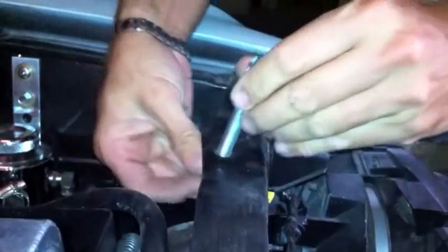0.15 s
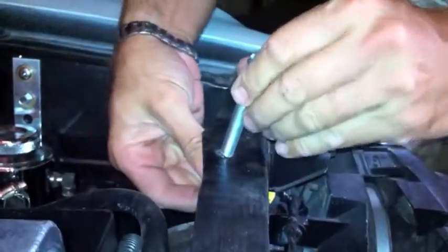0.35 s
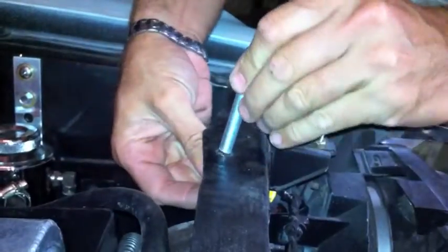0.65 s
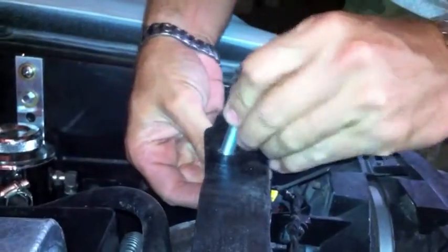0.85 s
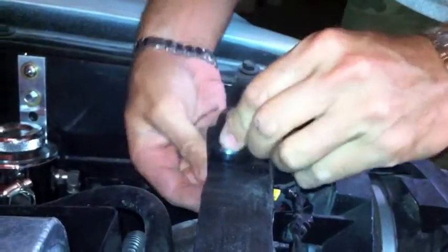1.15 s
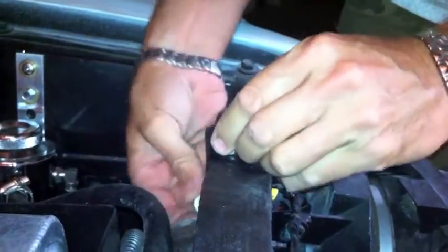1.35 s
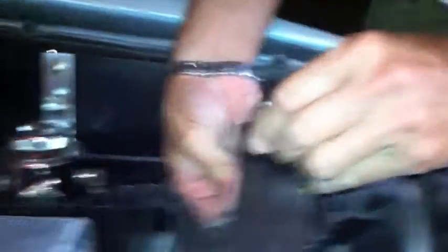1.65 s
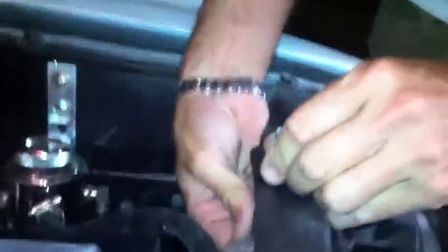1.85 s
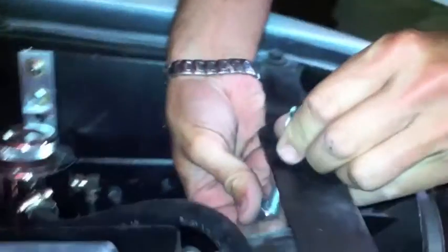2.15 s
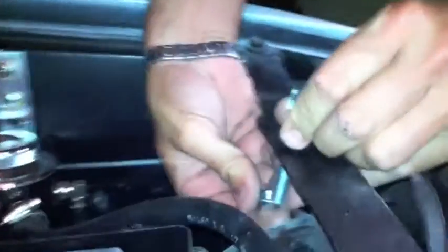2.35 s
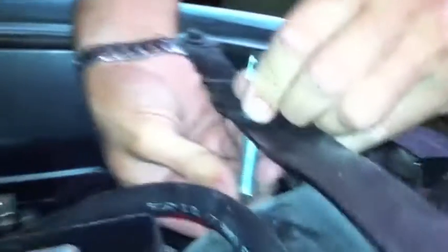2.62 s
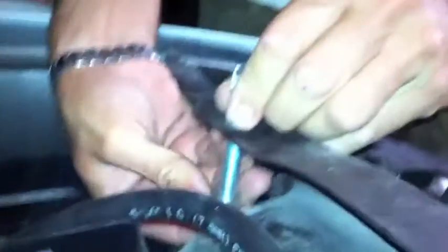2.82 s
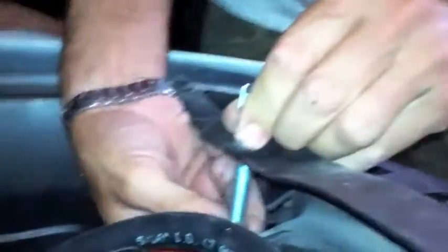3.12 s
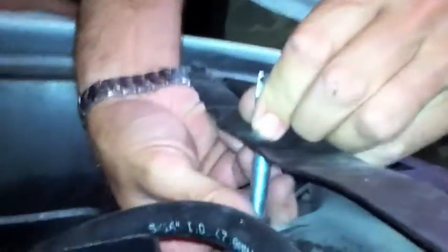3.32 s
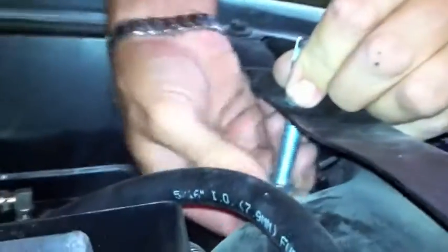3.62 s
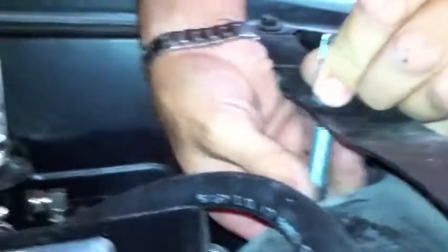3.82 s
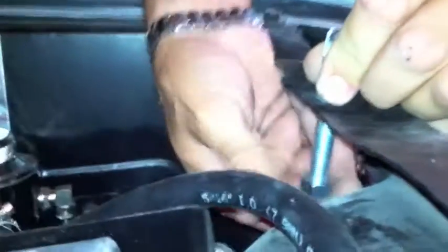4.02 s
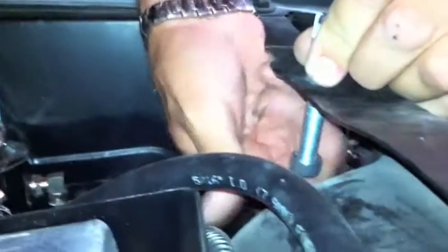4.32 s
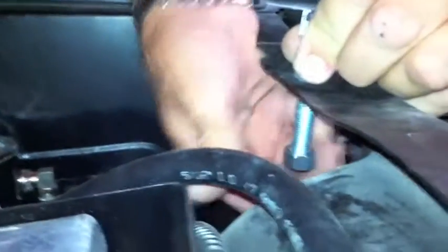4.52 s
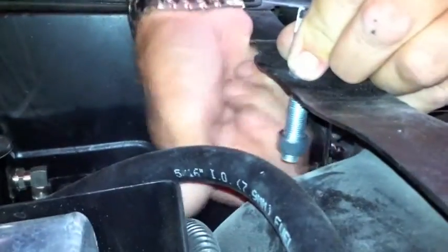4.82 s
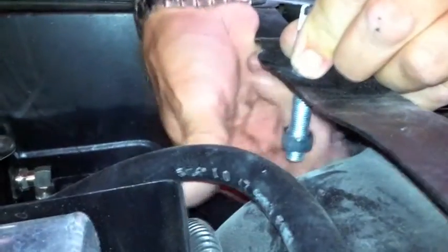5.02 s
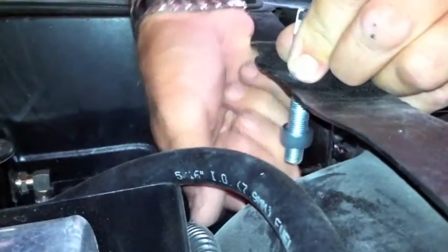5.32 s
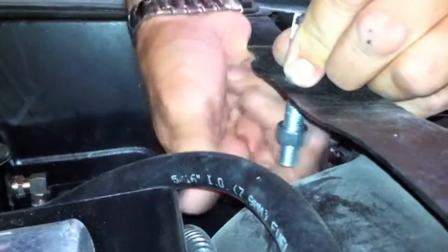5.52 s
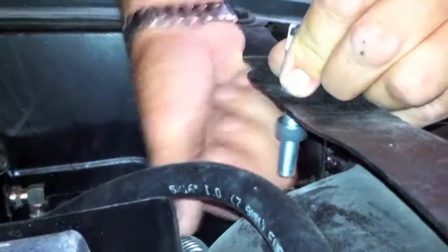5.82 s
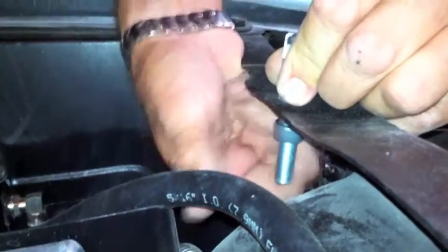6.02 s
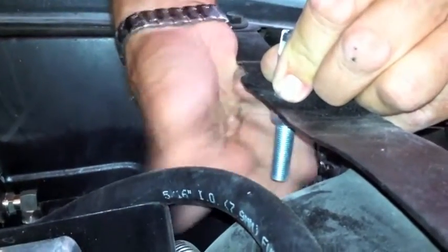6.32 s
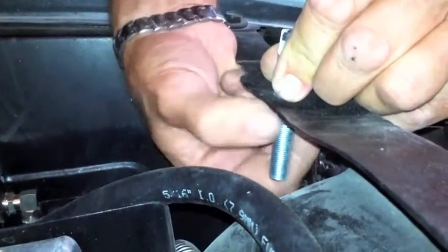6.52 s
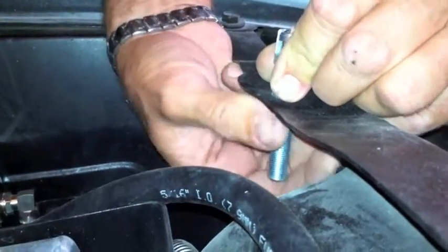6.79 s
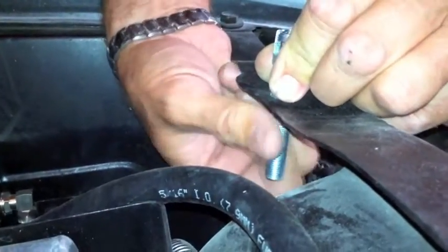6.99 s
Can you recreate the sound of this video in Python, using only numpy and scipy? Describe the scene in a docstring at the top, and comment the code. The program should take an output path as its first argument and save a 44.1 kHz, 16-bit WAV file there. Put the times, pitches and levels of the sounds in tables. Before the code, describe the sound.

A loose bolt clatters sharply through a hole in a metal strap, then a nut is spun up its thread in small raspy, ringing clicks.

```python
"""Bolt and nut in an engine bay

A bolt is pushed rattling through a hole in a steel strap, then a nut is spun up its thread.
Each contact is a short burst of tiny impacts that rings the strap or the nut; between them metal and skin rub.
The bay adds short dull echoes. Breeze bumps the microphone in the bass, over a soft outdoor hush."""
import sys
import numpy as np
from scipy import signal
from scipy.fft import rfft, irfft, next_fast_len
from scipy.io import wavfile

SR = 44100
rng = np.random.default_rng(int(sys.argv[2]) if len(sys.argv) > 2 else 0)


def bounce(signal):
    """Save signal as a 16-bit WAV file at the path given by the first command-line argument."""
    frames = np.transpose(np.atleast_2d(signal))
    limited = np.clip(frames, -1, 1)
    pcm = np.round(limited * 32767).astype(np.int16)
    wavfile.write(sys.argv[1], SR, pcm)


def gain_from_db(level_db):
    """Convert decibel levels to linear amplitude factors (20 dB per decade)."""
    decades = np.asarray(level_db, float) / 20
    return 10 ** decades


N = 315315

NUT_ON_S = 4.09  # from here on the nut rings instead of the strap
NUT_STOPS_S, STOP_T60_S = 6.405, 0.018  # the nut jams and a finger damps it


def bolt_in_strap(force):
    """The loose bolt rattles in the strap: broad clatter and ringing strap modes."""
    # modes of strap and loose bolt: f/Hz, width/Hz, level/dB
    strap_modes = [(385, 60, -8), (720, 70, -9), (900, 60, -4), (1040, 60, -5), (1210, 100, -3),
                   (1530, 50, -6), (2245, 40, -7), (2615, 40, -4), (2790, 50, 0), (3310, 110, -8),
                   (3690, 110, -5), (4300, 80, -8), (4590, 100, -3), (5110, 110, -2), (5290, 120, -1),
                   (5850, 60, -10), (6670, 160, -11), (8930, 90, -20)]
    # clatter density, levelled anew in each register: f/Hz, level/dB per Hz
    strap_colour = [(150, -29), (300, -10.5), (480, -14), (650, -7.5), (1100, -7.5), (1900, -6.5),
                    (2700, -8), (3300, -7.5), (5200, -4.5), (7500, -17.5), (12500, -21), (16000, -30)]
    t = np.arange(N) / SR
    return metal(force * (t < NUT_ON_S), strap_colour, strap_modes, ring_db=1, waver_db=3.5)


def nut_on_thread(force):
    """The nut rings on the thread; spinning close under the strap it rings higher up as well."""
    # modes of the nut on the thread: f/Hz, width/Hz, level/dB
    nut_modes = [(370, 70, -12), (750, 90, -7), (1060, 100, -7), (1330, 130, -7), (1670, 70, -5),
                 (1970, 110, -2), (2270, 80, -6), (2640, 90, -3), (3360, 110, -6), (4020, 140, -1),
                 (4990, 80, -1), (5370, 90, -2), (5800, 150, -9), (6300, 200, -10), (6820, 120, -8),
                 (9300, 300, -14)]
    # clatter density, levelled anew in each register: f/Hz, level/dB per Hz
    nut_colour = [(300, -22), (560, -15.5), (800, -8.5), (1300, -7.5), (2100, -8), (3100, -7.5),
                  (4200, -5.5), (5600, -4.5), (6900, -7.5), (7700, -12), (9400, -14), (12500, -21.5),
                  (15500, -24.5), (16500, -36)]
    # added mode close under the strap: f/Hz, width/Hz, level/dB
    near_modes = [(6810, 110, -2)]
    near_from_s = 6.04
    t = np.arange(N) / SR
    near = (t >= near_from_s) & (t < NUT_STOPS_S + STOP_T60_S)
    free = (t >= NUT_ON_S) & ~near
    spun = metal(force * free, nut_colour, nut_modes, ring_db=2, waver_db=3)
    return spun + metal(force * near, nut_colour, nut_modes + near_modes, ring_db=2, waver_db=3)


def pings():
    """Where a blow lands decides which pitch pings out: a short dying chatter of impacts into one mode."""
    # pings, levels ahead of the mix: t/s, rms level at the start/dB, f/Hz
    ping_rows = [(0.553, -26, 1210), (0.8579, -14, 4540), (0.907, -15, 2790), (0.948, -16, 5220),
                 (0.948, -18, 2790), (0.99, -31, 5170), (1.014, -39, 5200), (1.038, -37, 5160),
                 (1.063, -37, 5200), (1.088, -37, 5160), (1.109, -33, 5270), (1.121, -31, 5160),
                 (1.132, -20, 5060), (1.132, -25, 1530), (1.168, -34, 5140), (1.2, -27, 5200),
                 (1.212, -28, 5100), (1.252, -32.5, 5200), (1.426, -37, 1930), (1.531, -46, 1615),
                 (1.612, -35, 4460), (1.612, -30, 1940), (1.587, -38, 5250), (1.914, -35, 5180),
                 (2.045, -49, 700), (2.225, -32, 6480), (2.414, -43, 1570), (3.131, -43, 1150),
                 (3.494, -43, 4160), (4.017, -27.5, 5080), (4.017, -35, 5700), (4.159, -35, 5440),
                 (4.393, -37, 1650), (4.415, -41, 5450), (4.436, -43, 3850), (4.685, -32, 6350),
                 (5.155, -47, 6310), (5.332, -40, 4970), (5.353, -33, 1890), (5.388, -32, 3680),
                 (5.426, -38, 3920), (5.591, -35, 5730), (5.591, -35, 4270), (5.625, -28, 1660),
                 (5.828, -44, 5740), (5.828, -47, 1590), (5.918, -37, 2540), (5.918, -36, 4040),
                 (6.089, -37, 3980), (6.14, -37, 3980), (6.25, -38, 1960), (6.337, -34, 2640),
                 (6.383, -43, 3980), (6.383, -34, 5300), (6.818, -52, 1550), (6.818, -54, 5320),
                 (6.848, -48, 1680), (6.96, -47, 1590), (6.99, -55, 5250), (7.015, -44, 1900),
                 (7.058, -46, 2000)]
    t60_s, width_hz = 0.093, 160
    out = np.zeros(N + SR)
    after = np.arange(SR // 8) / SR
    for s, top_db, hz in ping_rows:
        chatter = rng.standard_normal(len(after))
        tone = rms_one(band(chatter, hz - width_hz / 2, hz + width_hz / 2))
        at = round(s * SR)
        out[at:at + len(after)] += tone * gain_from_db(top_db - 60 * after / t60_s)
    return out[:N]


def metal(force, colour, modes, ring_db, waver_db):
    """One shower of impacts makes a broad clatter, another drives the ringing modes, register by register."""
    light_touch_db = -51
    clatter, hits = (grains(per_s=12000, spread_db=2.5) for shower in range(2))
    out, drive = 0, 0
    for push, broad, plain in zip(force, registers(coloured(clatter, colour)), registers(hits)):
        out = out + push * broad / np.std(broad)
        drive = drive + push * plain / np.std(broad)
    # light touches are mostly skin and leave the metal quiet
    firm = force.sum(axis=0)
    drive = drive * firm / (firm + gain_from_db(light_touch_db))
    return out + gain_from_db(ring_db) * resonate(drive, modes, waver_db, waver_per_s=28)


def pressure(low_decay, high_decay, chatter_db, rasp_db):
    """Force envelopes for the four registers; the rub chatters as the threads catch."""
    # knocks of metal on metal, ahead of the mix: t/s, scrape level at the top/dB, boom re scrape/dB,
    # edge re scrape/dB, t60 of the scrape/s
    knock_rows = [(0.282, -57.5, 28.5, -23, 0.054), (0.5509, -17, -9.5, -9, 0.034),
                  (0.558, -32.5, 10, -2, 0.036), (0.787, -59, -10, 9, .03),
                  (0.858, -10.5, -17.5, -4, 0.073), (0.918, -24, -5, -16, .04),
                  (0.938, -19, -7.5, -12, 0.098), (0.948, -10.5, -26, -14.5, 0.083),
                  (0.957, -17, -9, -12, 0.052), (0.99, -33, -20, -20, .05), (1.014, -30, -20, -20, .05),
                  (1.038, -36, -20, -20, 0.041), (1.063, -38, -18, -20, 0.046),
                  (1.108, -26, -12, -20, 0.11), (1.121, -25.5, -0.5, -33.5, 0.059),
                  (1.19, -30, -1, -12, 0.052), (1.203, -25.5, 0, -15, .088),
                  (1.2122, -24, -1.5, -11.5, 0.064), (1.248, -33, 3.5, -14, 0.092),
                  (1.426, -36.5, -0.5, -17, 0.049), (1.478, -45, -8, -0.5, 0.048),
                  (1.531, -50, 2.5, -16, 0.089), (1.587, -38, -30, -10, 0.054),
                  (1.612, -28.5, -10, -23, 0.1), (1.914, -39, -4, -7, 0.075), (1.95, -50, -17, -2, 0.1),
                  (2.017, -50, 7.5, -17, 0.058), (2.053, -52.5, 12, -9, 0.073),
                  (2.225, -41, -3.5, -4.5, 0.15), (2.415, -49.5, 6, -20, 0.095),
                  (2.553, -43.5, -5, -18, 0.21), (2.577, -41.5, -2, 2, 0.087), (2.664, -49, 4, -7, 0.12),
                  (3.131, -44, 0, -11, 0.062), (3.364, -51, 1.5, -17, 0.11), (3.538, -67, -14, 21, .05),
                  (3.741, -56.5, 7, -1, 0.22), (3.784, -47.5, -2, -9, 0.37),
                  (4.017, -30.5, -12, 1.5, 0.051), (4.116, -56, 9, -15, .03),
                  (4.1242, -51, 11.5, -21, 0.037), (4.144, -35.5, -14, -14, 0.063),
                  (4.159, -31.5, -10.5, -6, 0.14), (4.285, -50, -8, -4, 0.28),
                  (4.393, -34, -11.5, -0.5, 0.11), (4.415, -32, -9, -13, 0.088),
                  (4.436, -30, -26, -41, 0.08), (4.615, -43, -11, -3, 0.042),
                  (4.642, -33, -12, -0.5, 0.073), (4.657, -32.5, 1.5, -21, 0.074),
                  (4.68, -29, -29, -7, 0.14), (4.89, -40, -4, 9.5, 0.09), (5.119, -26.5, -15, -4.5, 0.056),
                  (5.155, -38, -2, -10, 0.063), (5.332, -32, -10, -8, 0.057), (5.353, -35, 4, -15, 0.08),
                  (5.388, -29.5, -10.5, -5.5, 0.16), (5.426, -32.5, -13, -12, 0.12),
                  (5.453, -34.5, -6, -14, .06), (5.471, -35, -12, -18, 0.037), (5.566, -37, -5, -7, 0.061),
                  (5.591, -30.5, -20, -7, 0.057), (5.646, -32.5, -4, -17, 0.066),
                  (5.689, -40, -16, -6, 0.047), (5.767, -42, -17, -16, 0.089), (5.828, -36, -14, -7, 0.04),
                  (5.847, -36, 1.5, -13, 0.079), (6.054, -38.5, -7, -13, 0.082),
                  (6.089, -28, -17, -5, 0.038), (6.1172, -28, -12, -3.5, 0.13),
                  (6.14, -27, -14, -10, 0.057), (6.155, -36.5, -5, -3, 0.045), (6.249, -37, -14, -12, .06),
                  (6.3042, -37, -9, -6, 0.06), (6.336, -31, -8, -5.5, 0.089), (6.356, -31, -8, -12, 0.14),
                  (6.383, -29.5, -6, -7, 0.065), (6.674, -47, -1.5, -19, 0.09), (6.799, -54.5, 2, 6, .087),
                  (6.818, -48.5, -6, -10, 0.079), (6.848, -48, 1.5, -15, 0.037), (6.96, -48.5, 3, -8, 0.04),
                  (7.015, -46.5, -4, -9, 0.068), (7.058, -53, -2, -9, .08)]
    # glancing scuffs that swell before they die: t/s, scrape level at the top/dB, boom re scrape/dB,
    # edge re scrape/dB, rise/s
    scuff_rows = [(0.891, -16, -11, -16, 0.013), (0.9073, -8.5, -18, -12.5, 0.0018),
                  (1.079, -35.5, 2, -23, 0.017), (1.131, -21.5, -20, -12, 0.0024),
                  (1.167, -37, 8, -5, 0.003), (1.775, -48.5, -12, -11, 0.0073),
                  (2.197, -43, -3, -10, 0.022), (2.25, -42.5, -23, 1.5, 0.0051),
                  (2.351, -53.5, -11, -2, .0049), (2.52, -49, -13, -11, 0.015), (3.45, -47, -1, -5, 0.015),
                  (3.472, -41, -7.5, 2, 0.012), (3.494, -34, -12, -3.5, 0.0038),
                  (4.135, -41, -12, -9, 0.011), (4.549, -44, -6, -4, 0.0071),
                  (4.91, -29.5, -5, -16, 0.0045), (5.513, -40.5, -8, -19, 0.023),
                  (5.617, -29.5, -10, -4.5, 0.0094), (5.911, -32.5, -16, -6.5, 0.017),
                  (6.203, -33.5, -8, -12, 0.0075)]
    knock_rise_s = 0.00074
    scuff_t60_s, scuff_t60_per_rise = 0.039, 6.7  # a slower swell also dies more slowly
    patchy = 0.8  # each register's own flicker re the shared chatter
    t = np.arange(N) / SR
    flicker = drift(85) + patchy * np.array([drift(30) for register in range(4)])
    power = rubbing(t) * gain_from_db(chatter_db * flicker) ** 2
    after = t[:SR // 3]
    contacts = [(*row, knock_rise_s) for row in knock_rows]
    contacts += [(*row, scuff_t60_s + scuff_t60_per_rise * rise, rise) for *row, rise in scuff_rows]
    for s, top_db, boom_db, edge_db, t60, rise in contacts:
        at = round(s * SR)
        swell = np.minimum(after / rise, 1)
        # the rasp lies between boom and scrape, so it takes after both
        shares = [(boom_db, low_decay), (boom_db / 2 + rasp_db, low_decay), (0, 1), (edge_db, high_decay)]
        for k, (re_db, slow) in enumerate(shares):
            fall = gain_from_db(top_db + re_db - 60 * np.maximum(after - rise, 0) / (t60 * slow))
            if s < NUT_STOPS_S:
                fall = fall * gain_from_db(-60 * np.maximum(s + after - NUT_STOPS_S, 0) / STOP_T60_S)
            power[k, at:at + len(after)] += (fall * swell)[:N - at] ** 2
    return np.sqrt(power)


def rubbing(t):
    """Power of steady friction in the four registers: brushing hands, the sliding bolt, the spinning nut."""
    # strokes swell to a top and sag until they end: start t/s, length/s, stroke level at the top/dB, time to
    # the top/s, sag ahead of the register's share/dB
    bolt_slides = [(0.87, .22, -36, 0.14, 16.5), (1.085, 0.26, -41, 0.043, 20.5)]
    nut_spins = [(4.11, 0.27, -51.5, 0.1, 6.2), (4.4, 0.23, -48, 0.087, 7), (4.65, 0.28, -42, 0.14, 9.9),
                 (4.9, 0.15, -43.5, 0.027, 17.5), (5.13, 0.19, -48, 0.066, 12),
                 (5.385, 0.24, -43.5, 0.042, 4), (5.6, 0.25, -42.5, 0.023, 7.7),
                 (5.86, 0.2, -38.5, 0.023, 10.6), (6.1, 0.19, -41.5, 0.14, 4.3),
                 (6.31, 0.092, -39.5, 0.013, 9.2), (6.97, 0.12, -51, 0.061, 5.8)]
    # boom, rasp, scrape, edge of a stroke: offset from its stroke level/dB
    slide_re_db = (7.5, 2, -7, -16)
    spin_re_db = (-3.5, 1, -2.5, -8.5)
    # share of the sag in each register [ratio]: the treble follows speed most closely, the boom least
    sag_share = (.8, 1.01, 1.1, 1.6)
    # hands brushing the parts all along: t/s, dull brush level/dB, bright brush level/dB
    hand_rows = [(0.0, -58.5, -75), (0.43, -52.5, -71), (0.84, -57, -84), (1.4, -76, -83), (1.75, -64, -79),
                 (2.1, -82, -69), (2.52, -66, -65), (2.77, -91, -61.5), (3.0, -75, -56.5),
                 (3.19, -71, -62.5), (3.74, -63, -61.5), (4.0, -59, -69), (6.43, -64, -61),
                 (6.64, -67, -59.5), (7.15, -61, -57.5)]
    # rasp and scrape of the brushing re the mean of dull and bright: level/dB
    brush_middle_db = (-1.5, -2.5)
    swell_db = 1.5  # a stroke starts this far below its top, ahead of the share
    s, dull_db, bright_db = np.transpose(hand_rows)
    middle_db = (dull_db + bright_db) / 2
    levels_db = [dull_db, middle_db + brush_middle_db[0], middle_db + brush_middle_db[1], bright_db]
    power = np.array([gain_from_db(np.interp(t, s, level_db)) ** 2 for level_db in levels_db])
    for strokes, re_db in [(bolt_slides, slide_re_db), (nut_spins, spin_re_db)]:
        for start, length, top_db, to_top, sag_db in strokes:
            during = slice(round(start * SR), round((start + length) * SR))
            below_db = np.interp(t[during] - start, [0, to_top, length], [-swell_db, 0, -sag_db])
            stroke_db = top_db + np.outer(sag_share, below_db) + np.array(re_db)[:, None]
            power[:, during] += gain_from_db(stroke_db) ** 2
    return power


def grains(per_s, spread_db):
    """Tiny impacts at random moments, a few much stronger than the rest."""
    sizes = gain_from_db(spread_db * np.minimum(rng.exponential(1, N), 5)) * rng.choice([-1, 1], N)
    return rms_one(sizes * (rng.random(N) < per_s / SR))


def resonate(x, peaks, waver_db, waver_per_s):
    """Parallel resonances with alternating signs; the grip shifts how hard each one is driven."""
    out = 0
    for k, (hz, width, level_db) in enumerate(peaks):
        r = np.exp(-np.pi * width / SR)
        a = [1, -2 * r * np.cos(2 * np.pi * hz / SR), r * r]
        b = [(1 - r * r) / 2, 0, (r * r - 1) / 2]
        drive = x * gain_from_db(level_db + waver_db * drift(waver_per_s)) + 1e-18
        out = out + (-1) ** k * signal.lfilter(b, a, drive)
    return out


def registers(x):
    """Split into boom, rasp, scrape and edge that add back up to the whole."""
    boom_top_hz, rasp_top_hz, edge_from_hz = 1300, 2800, 7500
    below = [coloured(x, [(hz / 1.4, 0), (hz, -6), (hz * 1.4, -30)])
             for hz in (boom_top_hz, rasp_top_hz, edge_from_hz)]
    return np.diff([0 * x, *below, x], axis=0)


def engine_bay(x):
    """Short dull echoes from the hood and the fenders, as a dying band of noise."""
    after = np.arange(SR // 4) / SR
    tail = rng.standard_normal(len(after)) * gain_from_db(-60 * after / 0.17)
    echoes = band(tail, 300, 4000) / np.sqrt(np.sum(tail ** 2))
    return gain_from_db(-11) * signal.fftconvolve(x, echoes)[:N]


def bumps():
    """Air bumps the microphone: a short wobble swells and dies, its sharp middle reaching higher in pitch."""
    # bumps: t at the top/s, peak of the envelope/dB, nominal f/Hz (1.19 f at the top), spread/cycles of f
    bump_rows = [(0.13, -36, 214, 0.96), (0.168, -42, 224, 1.5), (0.192, -36, 156, 1.3),
                 (0.209, -38, 209, 1.1), (0.222, -30.5, 203, 1.7), (0.241, -36, 193, 1.1),
                 (0.374, -20, 220, 1.1), (0.388, -24.5, 172, 3), (0.404, -13.5, 326, 1.16),
                 (2.043, -30.5, 227, 1.2), (2.265, -40, 182, 1.9), (2.438, -35, 142, 1.2),
                 (2.45, -36, 167, 3.7), (2.46, -33, 200, 1.1), (2.47, -31, 210, 0.92),
                 (2.479, -21, 270, 0.72), (2.496, -29, 220, 1.7), (2.506, -36, 220, 1.2),
                 (2.526, -45, 207, 2), (2.681, -43, 240, 0.89), (2.7, -41, 188, 1.2), (2.871, -32, 210, 1),
                 (3.008, -33.5, 180, 0.79), (3.028, -39, 200, 1.4), (3.05, -38.5, 171, 0.95),
                 (3.102, -41.5, 190, 1.4), (6.965, -45, 260, 1.2)]
    out = np.zeros(N)
    for s, peak_db, hz, cycles in bump_rows:
        turn = np.arange(-SR // 20, SR // 20) * hz / SR
        shape = 1 / np.cosh(turn / cycles * 2.08)
        wobble = np.sin(2 * np.pi * (0.65 * turn + 0.12 * np.tanh(4.5 * turn)))
        at = round(s * SR) - SR // 20
        out[at:at + len(turn)] += gain_from_db(peak_db) * shape * wobble
    return out


def breeze():
    """Lumpy low noise of moving air."""
    # breeze at the microphone, ahead of the lumps: t/s, level/dB
    breeze_rows = [(0.0, -62), (0.14, -58), (0.3, -46.5), (0.5, -54), (1.05, -58), (1.2, -47), (1.39, -54),
                   (1.71, -63), (2.48, -52), (2.62, -56), (2.8, -62), (3.03, -54), (3.2, -76),
                   (4.02, -59.5), (4.82, -57), (5.12, -64), (5.4, -57.5), (6.11, -55.5), (6.5, -60.5),
                   (7.15, -58)]
    s, level_db = np.transpose(breeze_rows)
    rumble = rms_one(band(band(rng.standard_normal(N), 114, 490), 66, 510))
    lumps_db = 2.2 * drift(30)
    return gain_from_db(np.interp(np.arange(N) / SR, s, level_db) + lumps_db) * rumble


def outdoor_hush():
    """Steady, soft outdoor noise, strongest in the low registers."""
    # shape of the hush: f/Hz, relative level/dB
    hush_colour = [(15, -42.5), (25, -2), (48, -9.5), (142, 2.5), (367, -4), (432, -5), (743, -4),
                   (1680, -6), (2970, -14), (6520, -18), (15100, -29.5), (16400, -50)]
    hush = coloured(rng.standard_normal(N), hush_colour)
    return gain_from_db(-57) * hush / np.std(band(hush, 350, 16000))  # -57 dB rms within this band


def drift(per_s):
    """Slow chance with unit spread: random points joined by straight lines."""
    points = rng.standard_normal(int(8 * per_s) + 2)
    return np.interp(np.arange(N) / SR * per_s, np.arange(len(points)), points)


def rms_one(x):
    """Scale to unit rms."""
    return x / np.sqrt(np.mean(x ** 2) + 1e-20)


def coloured(x, spectrum):
    """Shape a noise by a (Hz, dB) spectrum, straight between its points over log frequency."""
    size = next_fast_len(N)
    hz = np.arange(size // 2 + 1) * SR / size + 1
    points = np.array(spectrum)
    gain_db = np.interp(np.log(hz), np.log(points[:, 0]), points[:, 1])
    return irfft(rfft(x, size) * gain_from_db(gain_db), size)[:N]


def band(x, low_hz, high_hz):
    """Fourth-order band-pass."""
    return signal.sosfilt(signal.butter(2, [low_hz, high_hz], "band", fs=SR, output="sos"), x)


def scene():
    """Metal with its echoes, air on the microphone, hush."""
    force = pressure(low_decay=1.25, high_decay=1.0, chatter_db=1.7, rasp_db=-1.5)
    work = bolt_in_strap(force) + nut_on_thread(force) + pings()
    mix = gain_from_db(-6.0) * work + engine_bay(work) + bumps() + breeze() + outdoor_hush()
    return mix[None]


def top_cut(x):
    """Nothing passes above the cut-off."""
    return signal.sosfilt(signal.butter(12, 16980, fs=SR, output="sos"), x)


def record(dry):
    """A small microphone with little bass and a cut top."""
    thin = signal.sosfilt(signal.butter(3, 70, "high", fs=SR, output="sos"), dry)
    thin = signal.sosfilt(signal.cheby2(16, 30, 16150, fs=SR, output="sos"), thin)
    return top_cut(thin)


dry = scene()
out = record(dry)
bounce(out)
```